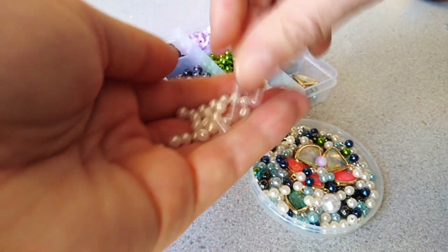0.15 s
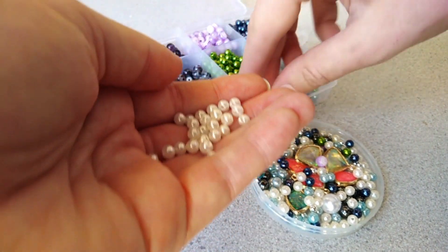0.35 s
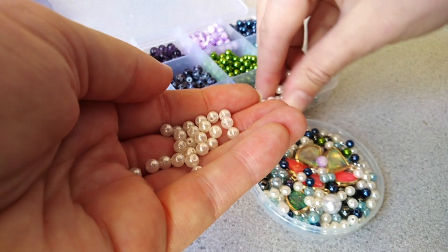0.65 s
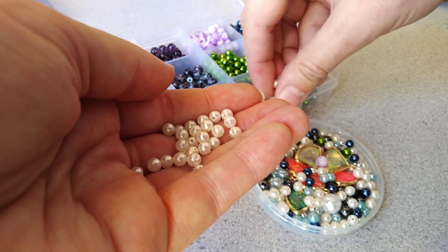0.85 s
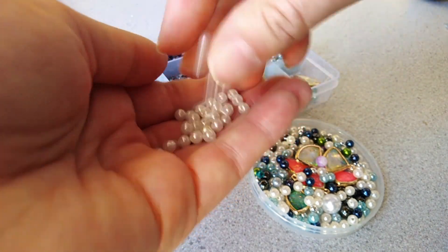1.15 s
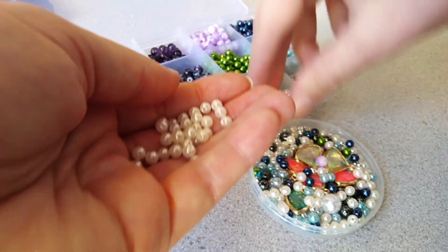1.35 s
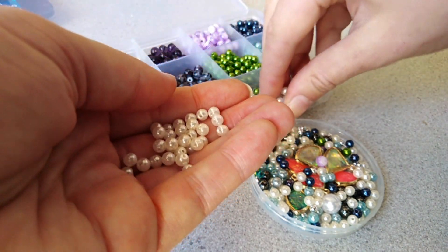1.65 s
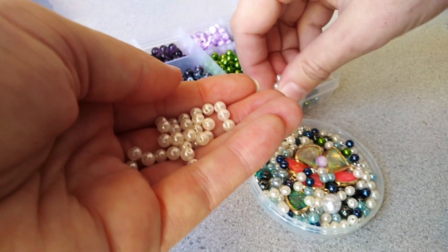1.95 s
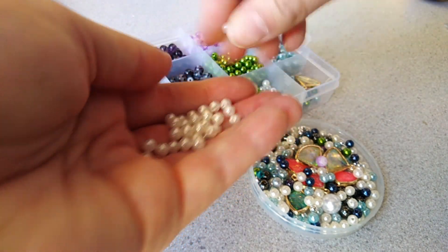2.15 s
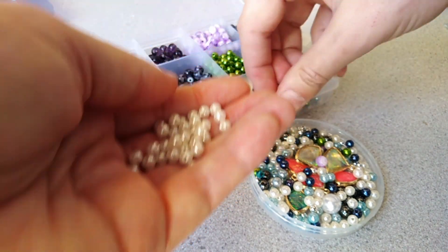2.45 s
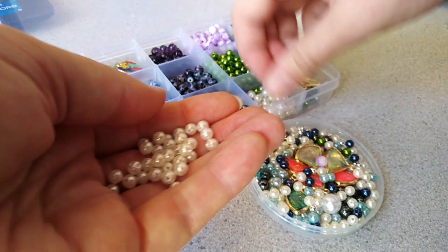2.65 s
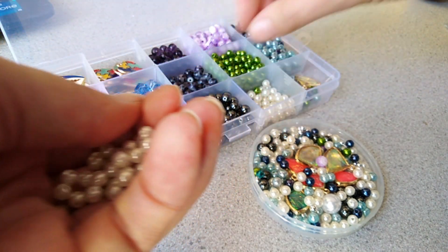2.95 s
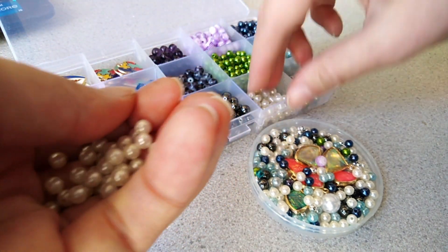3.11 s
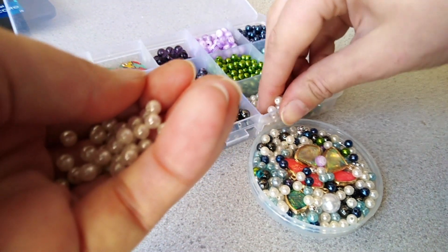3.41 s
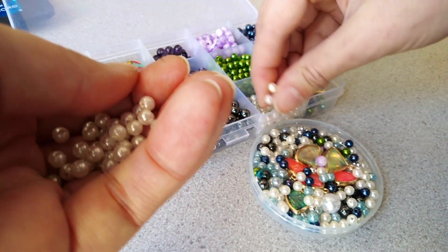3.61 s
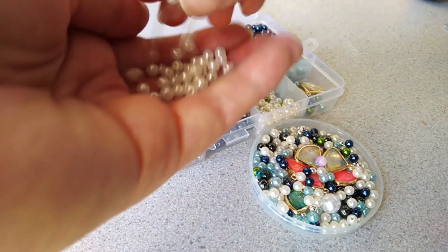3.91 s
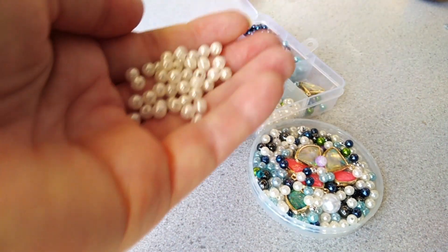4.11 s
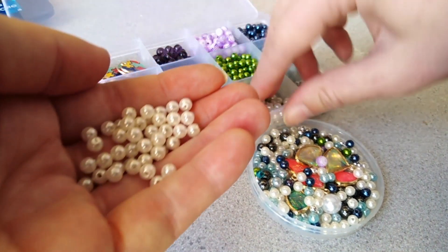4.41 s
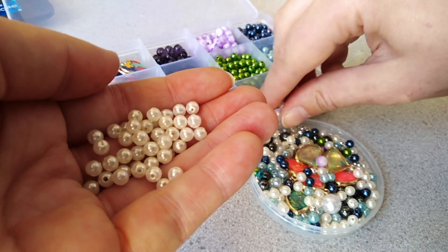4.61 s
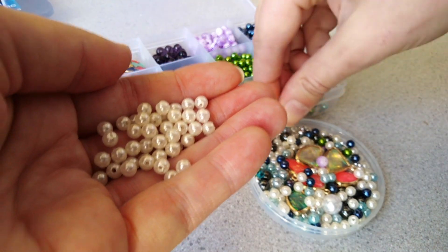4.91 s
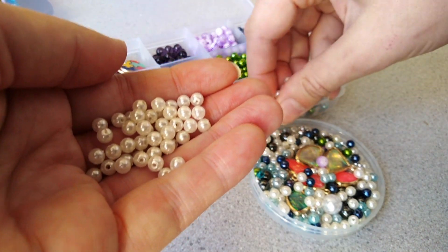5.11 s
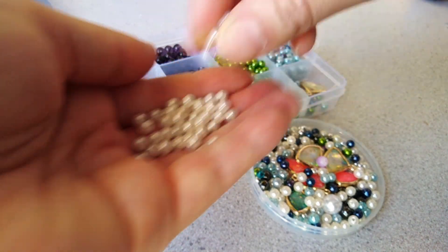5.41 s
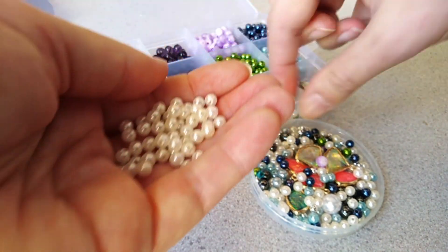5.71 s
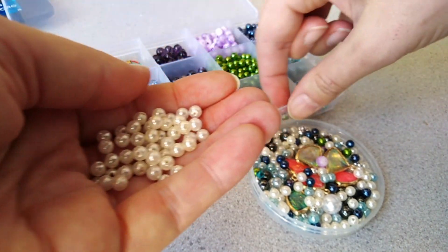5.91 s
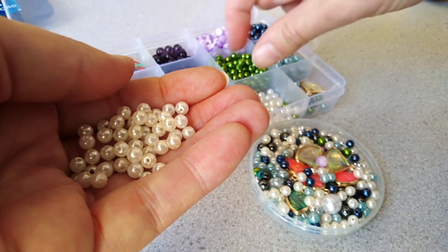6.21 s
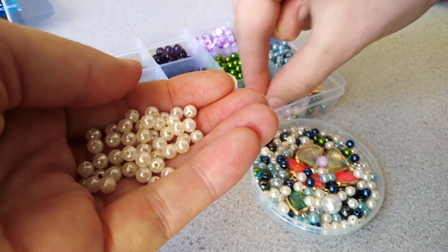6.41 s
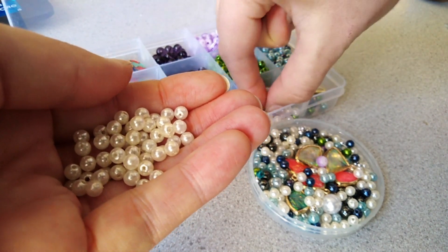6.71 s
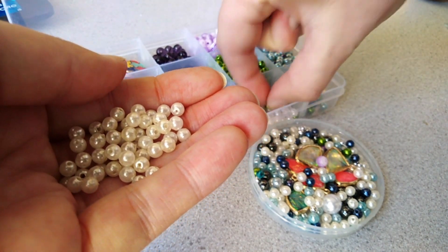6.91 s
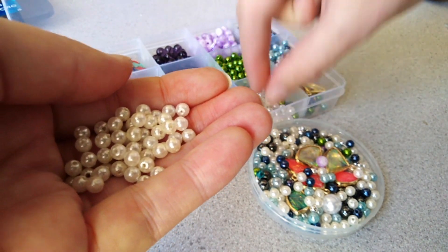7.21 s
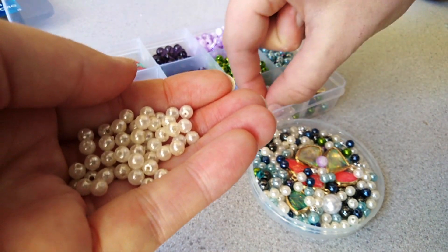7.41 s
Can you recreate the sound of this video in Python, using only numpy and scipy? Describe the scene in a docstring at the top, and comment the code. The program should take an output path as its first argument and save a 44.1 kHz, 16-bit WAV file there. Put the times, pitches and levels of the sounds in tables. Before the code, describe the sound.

Close, crisp bead rattles and single clicks come in bursts as fingertips stir a plastic box, with faint low thumps and quiet gaps.

```python
"""Beads picked from a compartment box

Fingers pick small plastic beads out of a compartment of an organizer box and drop them into a cupped hand.
The room is quiet and dry, and the box lies close by, a little to the right.
Each collision is a filtered noise burst; fingertip pushes govern random showers of such bursts.
The box floor is a bank of resonances driven by random slips; lone knocks, palm drops, nail scrapes,
box nudges, brushed skin and a steady hush complete the scene."""
import sys
import numpy as np
from scipy import signal
from scipy.fft import rfft, irfft
from scipy.io import wavfile

SR = 44100
rng = np.random.default_rng(int(sys.argv[2]) if len(sys.argv) > 2 else 0)


def transcribe(u):
    """Save the signal u as a 16-bit wav file named by the first command-line argument.

    u: samples, shape (n,) or (channels, n), limited to [-1, 1]; the rate is SR.
    q: integer samples, one column per channel.
    """
    v = np.clip(np.atleast_2d(u).T, -1, 1)
    q = np.round(v * 32767).astype(np.int16)
    wavfile.write(sys.argv[1], SR, q)


N = 332955
TIME = np.arange(N) / SR   # seconds

# Spectrum of the room hush. Each row: frequency in Hz, relative level in dB.
HUSH_SPECTRUM = [(30, 1), (100, 6), (300, -3.5), (900, -22), (1800, -18), (4000, -3), (9000, -8),
                 (14000, -4.5)]
HUSH_DB = -100
# The hand nudges the box on the table. Each row: start in seconds, peak in dB, frequency in Hz, rise in seconds.
BOX_NUDGES = [(0.338, -59.5, 286, 0.0093), (0.471, -53.5, 278, .012), (2.83, -57, 433, 0.0044),
              (2.848, -60, 396, 0.0077), (3.42, -67, 450, .006), (4.235, -42, 102, 0.006)]
# Skin brushes skin as the hand lifts. Each row: time in seconds, relative level in dB, centre in Hz.
SKIN_BRUSH = [(6.955, -100, 1120), (6.994, -65, 900), (7.04, -74, 520), (7.08, -81, 380),
              (7.15, -85.5, 312), (7.2, -110, 291)]
# Modes of the loaded box floor. Each row: frequency in Hz, nominal width in Hz, relative level in dB.
FLOOR_MODES = [(84, 44, -2), (106, 33, 0.5), (184, 17, -11), (279, 30, -13), (407, 61, -15), (780, 90, -13),
               (1300, 510, -7.5)]
# Colour of beads in the thin-walled box. Each row: frequency in Hz, relative level in dB.
BEAD_SPECTRUM = [(300, -49.5), (750, -42.5), (1100, -30.5), (1500, -20.5), (2000, -16.5), (2500, -11.5),
                 (3200, -4.5), (4100, -12.5), (5100, -3.5), (6200, -2), (7800, 2), (9700, 7), (12000, -1.5),
                 (14000, -12)]
# The left microphone is shaded from the box. Each row: frequency in Hz, left minus right in dB.
LEFT_SHADE = [(1000, 0.5), (3200, -6.5), (4100, -0.5), (6000, -6), (8000, -9.5), (9700, -17.5),
              (12000, -11), (14000, -6.5)]
# Short rings of the compartment walls. Each row: frequency in Hz, width in Hz, largest lift in dB before scatter.
WALL_RINGS = [(2550, 230, 8), (2960, 49, 1), (3770, 200, 5.5), (4820, 110, 6), (5640, 390, 6.5),
              (6220, 930, 6), (7130, 280, 0), (9750, 300, 1.5), (10090, 260, -1.5)]
# A fingertip rolls through the heap, swelling and fading.
# Each row: peak in seconds, rise time in seconds, relative rattle level in dB, relative box floor level in dB.
HEAP_STIRS = [(0.469, 0.053, -28, -55), (0.623, 0.017, -46.5, -66), (0.763, .024, -36.5, -70),
              (0.864, 0.032, -38, -73.5), (0.948, 0.03, -39.5, -71), (1.024, 0.027, -47.5, -82),
              (1.48, 0.033, -38, -64.5), (1.595, 0.024, -29, -58), (1.772, 0.027, -29.5, -60),
              (1.935, 0.019, -32.5, -69), (1.988, .014, -39, -77), (2.497, .01, -43, -80),
              (2.545, .013, -52, -73), (2.894, 0.015, -41, -62.5), (3.25, 0.025, -24, -51.5),
              (3.346, 0.057, -39.5, -63.5), (3.478, 0.044, -47.5, -66), (3.594, 0.015, -45.5, -72.5),
              (3.662, 0.038, -33.5, -83), (3.825, 0.011, -55, -100), (4.535, 0.019, -27, -53),
              (4.661, 0.012, -35, -56.5), (4.706, 0.012, -39, -60), (4.756, 0.023, -34, -53.5),
              (4.866, 0.035, -47.5, -59.5), (4.966, 0.0075, -45, -70), (5.13, .01, -52, -81),
              (5.285, .012, -49, -89), (5.529, 0.02, -56, -82.5), (6.122, 0.0089, -59, -69),
              (6.518, 0.015, -42, -60.5), (6.573, 0.021, -36, -60), (6.636, 0.033, -40, -62.5),
              (6.793, 0.01, -45.5, -67.5), (6.868, 0.022, -51.5, -72), (6.994, 0.018, -51.5, -66),
              (7.348, 0.0094, -47.5, -74), (7.517, 0.0084, -49.5, -62.5)]
STIR_FADE = 0.95   # fall time over rise time
# A fingertip jabs into the heap, which gives at once and then settles.
# Each row: peak in seconds, relative rattle level in dB, relative box floor level in dB.
HEAP_JABS = [(0.0, -47, -75), (0.344, -25.5, -52.5), (1.39, -30, -48.5), (2.036, -44, -75.5),
             (2.433, -38, -86), (2.836, -29.5, -58), (3.174, -32, -57.5), (4.238, -66, -60),
             (4.451, -37.5, -48.5), (4.592, -21.5, -56), (5.823, -38, -88), (6.427, -48, -80),
             (6.937, -48.5, -63), (7.292, -35.5, -64.5)]
JAB_RISE_S, JAB_SETTLE_S = 0.005, 0.03
# The fingers are down among the beads. Each row: start in seconds, end in seconds.
FINGER_SEARCHES = [(0, .1), (.33, 1.07), (1.39, 2.085), (2.43, 2.6), (3.16, 3.7), (4.43, 5.58),
                   (5.79, 5.94), (6.43, 7.0), (7.28, 7.5)]
# A fingernail catches a wall of the box. Each row: start in seconds, relative level in dB, length in seconds.
NAIL_SCRAPES = [(.318, -51.5, 0.019), (3.528, -52, 0.0073), (3.557, -49.5, 0.0086), (4.23, -51, 0.046),
                (4.331, -49, 0.0049), (4.862, -39, .008), (5.73, -47.5, 0.0093), (7.216, -50, 0.0039)]
# Beads land among those in the palm. Each row: landing in seconds, relative level in dB.
PALM_DROPS = [(0.185, -41), (1.2052, -42.5), (2.2646, -44.5), (3.9445, -43.5), (3.986, -40), (4.036, -57),
              (5.495, -39), (5.507, -41), (5.518, -40), (5.534, -39), (5.556, -43), (5.66, -63)]
# Single beads knock in the box. Each row: time in seconds, relative level in dB, pitch of the click in Hz.
BEAD_KNOCKS = [(0.0132, -44, 6800), (0.039, -41, 8200), (.057, -47, 7200), (.0764, -51.5, 6840),
               (.37, -31, 7800), (0.3792, -32.5, 7400), (.3921, -31, 7400), (.463, -26, 8300),
               (0.5745, -41.5, 7000), (.616, -37.5, 8400), (0.6333, -42, 7340), (.682, -49, 7900),
               (.708, -39, 7160), (0.7599, -19.5, 7170), (0.806, -37, 6000), (.8452, -35.5, 8350),
               (.8617, -36, 7000), (.878, -33, 7050), (.8887, -38, 6850), (0.9319, -33, 7800),
               (.9766, -40, 8000), (.9938, -26.5, 7400), (1.0149, -38.5, 6400), (1.0352, -26, 7560),
               (1.3912, -21.5, 6850), (1.4552, -32.5, 8400), (1.4878, -31.5, 7400), (1.538, -37.5, 8750),
               (1.5812, -27, 8100), (1.837, -43.5, 6300), (1.877, -44.5, 6250), (1.9099, -38, 8200),
               (1.9244, -36, 6300), (1.945, -32, 6600), (1.991, -35.5, 7100), (2.0203, -43, 6900),
               (2.0395, -35, 7400), (2.07, -36, 6800), (2.0857, -45, 6900), (2.145, -62, 6300),
               (2.1747, -49, 5900), (2.434, -33.5, 4950), (2.4526, -29.5, 8600), (2.5317, -42, 7640),
               (2.5406, -42.5, 8450), (2.5866, -50.5, 6650), (2.8583, -31.5, 7400), (2.8843, -36, 7780),
               (2.942, -51.5, 7780), (3.153, -49, 5430), (3.1746, -22.5, 8700), (3.2702, -20.5, 8800),
               (3.3164, -23.5, 7800), (3.3412, -26.5, 9100), (3.4405, -28.5, 8900), (3.4744, -32, 8200),
               (3.6487, -28, 6500), (3.6816, -29, 7300), (3.714, -34, 7950), (3.7554, -29, 8350),
               (3.772, -32.5, 8300), (3.808, -37.5, 8700), (3.8263, -48, 6640), (4.4298, -50, 5470),
               (4.4545, -33, 9800), (4.474, -34.5, 7700), (4.5154, -29, 9300), (4.5376, -22, 8500),
               (4.5956, -19, 7000), (4.619, -18.5, 8400), (4.665, -30, 9700), (4.7094, -22.5, 9400),
               (4.7394, -26.5, 8860), (4.7587, -23.5, 7440), (4.8255, -26.5, 8700), (4.8877, -38.5, 7900),
               (4.8973, -27, 9000), (4.9635, -38, 8250), (5.056, -40.5, 7200), (5.0729, -41.5, 8800),
               (5.1173, -45.5, 8200), (5.168, -54.5, 5950), (5.23, -46, 7560), (5.262, -33.5, 7700),
               (5.3143, -33.5, 7000), (5.3482, -43, 7900), (5.3841, -30, 7900), (5.3932, -33, 8800),
               (5.412, -47.5, 6870), (5.4279, -43, 7700), (5.4655, -47.5, 7020), (5.7957, -53, 6900),
               (5.8473, -34.5, 5940), (5.9152, -34.5, 7150), (6.0304, -41, 7700), (6.0445, -36.5, 8050),
               (6.1203, -53.5, 7730), (6.262, -47, 7700), (6.2786, -43, 6950), (6.4987, -29.5, 9300),
               (6.7696, -50.5, 8800), (6.836, -33, 10000), (6.8558, -32, 10000), (6.8722, -37, 8700),
               (6.9399, -32.5, 8500), (6.9785, -32, 8700), (7.1496, -48, 8100), (7.1812, -61, 6300),
               (7.353, -34, 8750), (7.471, -48.5, 7950), (7.5152, -34, 7600)]

BEAD_HZ, PALM_HZ = 7503, 11500   # central pitch in the heap; pitch of a bead cushioned by the hand
NEUTRAL_HZ = 7943   # a contact at this pitch is not tilted away from the bead colour
CUTOFF_HZ = 14300


def from_db(db):
    """Logarithmic scale: decibels to amplitude gain."""
    return 10 ** (np.asarray(db) / 20)


def rms_one(x):
    """Power normalisation: scale to unit mean square."""
    return x / np.sqrt(np.mean(x ** 2) + 1e-20)


def gains_of(points, size=2048):
    """Spectral envelope: level points interpolated over log frequency onto an even grid of gains."""
    hz, db = np.transpose(points)
    grid_hz = np.fft.rfftfreq(size, 1 / SR)
    return from_db(np.interp(np.log(grid_hz + 1), np.log(hz), db))


def coloured(x, gains):
    """Minimum-phase filtering: folding the cepstrum makes the given gains causal, one row per channel."""
    cepstrum = irfft(np.log(gains))
    half = cepstrum.shape[-1] // 2
    cepstrum[:, 1:half] *= 2
    cepstrum[:, half + 1:] = 0
    impulse = irfft(np.exp(rfft(cepstrum)))
    return signal.oaconvolve(x, impulse, axes=-1)[:, :N]


def resonance(x, hz, width_hz):
    """Damped oscillator: a two-pole resonance with near-unit gain at its peak."""
    r = np.exp(-np.pi * width_hz / SR)
    numerator = np.array([1, 0, -1]) * (1 - r * r) / 2
    return signal.lfilter(numerator, [1, -2 * r * np.cos(2 * np.pi * hz / SR), r * r], x)


def add(out, at, sound):
    """Superposition: mix a short stereo sound in from a given sample."""
    out[:, at:at + sound.shape[1]] += sound[:, :max(N - at, 0)]


def contact(hz, snap_t60=0.0029, wall_db=-8, wall_t60=0.026, tail_db=-30, tail_t60=0.065,
            tilt_db=15, patchy_db=4, damping=2.4, onset_s=0.00031, size=2048):
    """Impact: a snap, the dense short ring of the walls and a faint tail off the table, at unit energy."""
    t, f = TIME[:size], np.fft.rfftfreq(size, 1 / SR)
    # the brightest contacts happen away from the walls and die soonest
    haste = max(hz / NEUTRAL_HZ, 1) ** damping

    def fade(t60):
        """Exponential decay: 60 dB in t60 seconds, sooner above the neutral pitch."""
        return np.exp(-np.log(1000) * t / t60 * haste)

    envelope = fade(snap_t60) + from_db(wall_db) * fade(wall_t60) + from_db(tail_db) * fade(tail_t60)
    onset = 1 - np.exp(-t / onset_s)   # the walls take a moment to answer
    burst = rng.standard_normal((2, size)) * envelope * onset
    # hard bead-on-bead contacts are bright, soft ones on the box are dull
    db = tilt_db * np.log2(hz / NEUTRAL_HZ) * np.log2(np.maximum(f, 2800) / 8000)
    # each spot has a colour of its own and excites the wall modes differently
    db = db + patchy_db * np.interp(f, np.linspace(0, SR / 2, num=40), rng.standard_normal(40))
    for centre, width, lift in WALL_RINGS:
        db = db + rng.uniform(0, 1.1) * lift / (1 + (2 * (f - centre) / width) ** 2)
    right = from_db(db) * gains_of(BEAD_SPECTRUM)
    left = right * gains_of(LEFT_SHADE)
    burst = coloured(burst, np.array([left, right]))[:, :size]
    burst[0] = np.roll(burst[0], shift=6)   # the sound reaches the left microphone a little later
    return rms_one(burst) / np.sqrt(size)


def pushes():
    """Applied force: each fingertip move as (peak s, rattle dB, box floor dB, rise s, fall s)."""
    jabs = [(s, db, floor_db, JAB_RISE_S, JAB_SETTLE_S) for s, db, floor_db in HEAP_JABS]
    stirs = [(s, db, floor_db, rise, STIR_FADE * rise) for s, rise, db, floor_db in HEAP_STIRS]
    return jabs + stirs


def swell(rows, rise_shape=1.74, fall_shape=1.486):
    """Incoherent addition: the powers of overlapping pushes (s, dB, rise s, fall s) sum to one envelope."""
    power, coarse = 0, TIME[::16]
    for s, db, rise, fall in rows:
        before = np.maximum(s - coarse, 0) / max(rise, 1e-3)
        after = np.maximum(coarse - s, 0) / max(fall, 1e-3)
        shape = np.exp(-np.minimum(before ** rise_shape + after ** fall_shape, 20))
        power = power + (from_db(db) * shape) ** 2
    return np.interp(TIME, coarse, np.sqrt(power))


def room_hush():
    """Stationary noise: independent spectrally shaped noise in each channel."""
    return from_db(HUSH_DB) * rms_one(coloured(rng.standard_normal((2, N)), gains_of(HUSH_SPECTRUM)[None]))


def room(x, wet_db=-39, t60=0.14, size=16000):
    """Reverberation: convolution with decaying noise gives the faint diffuse answer of the room."""
    tail = rng.standard_normal((2, size)) * np.exp(-np.log(1000) * TIME[:size] / t60)
    tail = rms_one(tail) / np.sqrt(size)
    return x + from_db(wet_db) * signal.oaconvolve(x, tail, axes=-1)[:, :N]


def bumps():
    """Damped rocking: a soft nudge sets the box swinging sinusoidally for a few cycles."""
    out = 0
    for s, db, hz, rise in BOX_NUDGES:
        t = np.maximum(TIME - s, 0)
        envelope = (t / rise * np.exp(1 - np.minimum(t / rise, 20))) ** 2
        out = out + from_db(db) * envelope * np.sin(2 * np.pi * hz * t)
    return out


def brush(width_octaves=0.9, count=6):
    """Friction: soft band-limited noise that darkens as the stroke slows."""
    s, db, centre = np.transpose(SKIN_BRUSH)
    centre, out = np.interp(TIME, s, centre), 0
    for hz in np.geomspace(250, 2000, count):
        weight = np.exp(-(np.log2(hz / centre) / width_octaves) ** 2)
        band = resonance(resonance(rng.standard_normal((2, N)), hz, hz / 2), hz, hz / 2)
        out = out + weight * rms_one(band)
    return from_db(np.interp(TIME, s, db)) * out / 2


def box_floor(level_db=-3, lag_s=0.0055, linger_s=0.0024, apart_db=-9, lowest_hz=55, per_s=800,
              spread_db=3.5, hardness=0.15, firm_db=-55):
    """Modal excitation: slipping beads drum on the floor, and a firm push reaches its higher modes."""
    push = swell([(s + lag_s, db, rise, fall + linger_s) for s, _, db, rise, fall in pushes()])
    firm = np.clip(push / from_db(firm_db), 0.03, 3)
    slips = (rng.random(N) < per_s / SR) * from_db(spread_db * np.clip(rng.standard_normal(N), -2, 2))
    out = 0
    for hz, width, db in FLOOR_MODES:
        # the channels share one force and differ by an opposed part that grows with frequency
        shared = rng.standard_normal(N)
        opposed = rng.standard_normal(N) * np.array([[1], [-1]])
        force = slips * (shared + from_db(apart_db) * np.sqrt(hz / 200) * opposed)
        ring = rms_one(resonance(resonance(force, hz, 2 * width), hz, 2 * width))
        out = out + from_db(db) * ring * firm ** (hardness * np.log2(hz / 115))
    high_pass = signal.butter(2, lowest_hz, "high", fs=SR, output="sos")
    return from_db(level_db) * signal.sosfilt(high_pass, push * out)


def searching(level_db=-44, per_s=90, spread_db=4.5, scatter_octaves=0.12, count=12):
    """Random arrivals: while the fingers feel about, barely touched beads keep ticking faintly."""
    sounds = [contact(BEAD_HZ * 2 ** rng.normal(0, scatter_octaves)) for _ in range(count)]
    inside = sum((TIME > start) & (TIME < end) for start, end in FINGER_SEARCHES)
    ticks = inside * (rng.random(N) < per_s / SR) * from_db(level_db + spread_db * rng.standard_normal(N))
    bead, out = rng.integers(0, count, N), np.zeros((2, N))
    for at in np.flatnonzero(ticks):
        add(out, at, ticks[at] * sounds[bead[at]])
    return out


def scrapes(level_db=20, nail_hz=4500, fade_db=14, count=8):
    """Stick-slip: the nail skids along the thin wall in a quick, fading run of dull slips."""
    out = np.zeros((2, N))
    for s, db, length in NAIL_SCRAPES:
        for part in (np.arange(count) + rng.random(count)) / count:
            gain = from_db(db + level_db - fade_db * part)
            add(out, int((s + part * length) * SR), gain * contact(nail_hz))
    return out


def toppling(level_db=19, follows=0.68, typical_db=-40, fade_db_per_s=130, within_falls=1.6,
             spread_db=4, count=3):
    """Relaxation: as a push eases, a few dislodged beads topple back, on average softer when later."""
    out = np.zeros((2, N))
    for s, db, _, _, fall in pushes():
        base_db = level_db + typical_db + follows * (db - typical_db)
        for later in within_falls * fall * (np.arange(count) + rng.random(count)) / count:
            strength = base_db - fade_db_per_s * later + rng.normal(0, spread_db)
            sound = contact(BEAD_HZ * 2 ** rng.normal(0, 0.053))
            add(out, max(int((s + later) * SR), 0), from_db(strength) * sound)
    return out


def drops(level_db=22, graze_db=-15, graze_s=0.012, shuffle_db=-9, fade_db_per_s=330, within_s=0.08,
          spread_db=4, count=8):
    """Cushioned impact: a bead grazes the pile in the palm, ticks brightly, and its neighbours shuffle."""
    out = np.zeros((2, N))
    for s, db in PALM_DROPS:
        touches = [(-graze_s, graze_db), (0, 0)]
        for later in within_s * (np.arange(count) + rng.random(count)) / count:
            touches.append((later, shuffle_db - fade_db_per_s * later + rng.normal(0, spread_db)))
        for later, touch_db in touches:
            add(out, int((s + later) * SR), from_db(db + level_db + touch_db) * contact(PALM_HZ))
    return out


def knocks(level_db=22, graze_db=-18, graze_s=0.0017, rebound_db=-18, rebound_s=0.018):
    """Collision and rebound: a lone bead grazes a neighbour, knocks against a wall and rebounds once."""
    out = np.zeros((2, N))
    for s, db, hz in BEAD_KNOCKS:
        graze = (s - graze_s * rng.uniform(0.24, 1), graze_db + rng.normal(0, 4))
        rebound = (s + rebound_s * rng.uniform(0.25, 1), rebound_db + rng.normal(0, 1.6))
        for at, touch_db in [(s, 0), graze, rebound]:
            sound = contact(hz, snap_t60=0.002, wall_db=-13, wall_t60=0.028, patchy_db=3.5, onset_s=0.0002)
            add(out, max(int(at * SR), 0), from_db(db + level_db + touch_db) * sound)
    return out


def rattle(level_db=-0.5, per_s=650, growth=0.6, busy_db=-35, spread_db=6, even_s=0.0086,
           scatter_octaves=0.16, low_hz=4300, high_hz=13000, count=36):
    """Granular collisions: a harder push sets more beads colliding, with clicks of scattered pitch."""
    push = swell([(s, db, rise, fall) for s, db, _, rise, fall in pushes()])
    effort = np.clip(push / from_db(busy_db), 0.12, 10)
    arrivals = rng.random(N) < per_s * effort ** growth / SR
    hits = arrivals * from_db(spread_db * rng.standard_normal(N)) * rng.choice([-1, 1], N)
    # the energy of the push is shared among the beads that move at that moment
    window = signal.windows.hann(int(2 * even_s * SR))
    shared = signal.oaconvolve(hits ** 2, window / window.sum(), "same")
    hits = hits * push / np.sqrt(np.abs(shared) + 1e-4)
    # clicks are drawn from a stock of contacts at graded pitches
    pitches = np.geomspace(low_hz, high_hz, count)
    pitch = BEAD_HZ * 2 ** (scatter_octaves * rng.standard_normal(N))
    bead = np.minimum(np.searchsorted(pitches, pitch), count - 1)
    sounds, out = [contact(hz) for hz in pitches], np.zeros((2, N))
    for at in np.flatnonzero(hits):
        add(out, at, hits[at] * sounds[bead[at]])
    return from_db(level_db) * out


def scene():
    """Superposition: beads to the right, the box floor in the middle, a hush beneath."""
    beads = searching() + scrapes() + toppling() + drops() + knocks() + rattle()
    return room(beads + box_floor() + bumps() + brush()) + room_hush()


def record(dry):
    """Band limiting: a steep low-pass filter cuts the top."""
    low_pass = signal.cheby1(10, 0.3, CUTOFF_HZ, fs=SR, output="sos")
    return signal.sosfilt(low_pass, dry)


dry = scene()
out = record(dry)
transcribe(out)
```